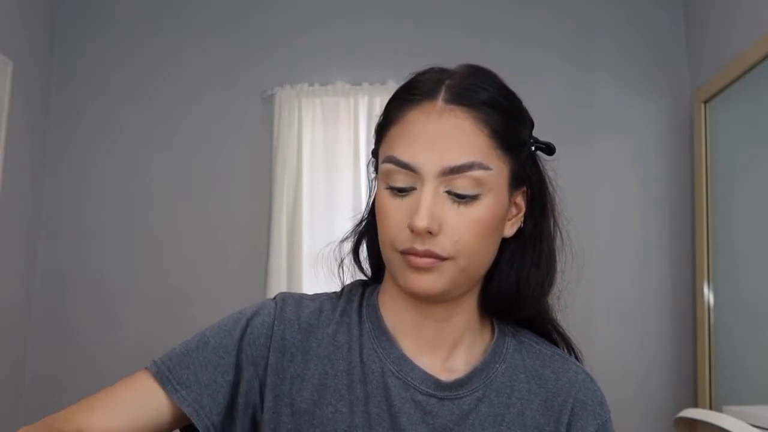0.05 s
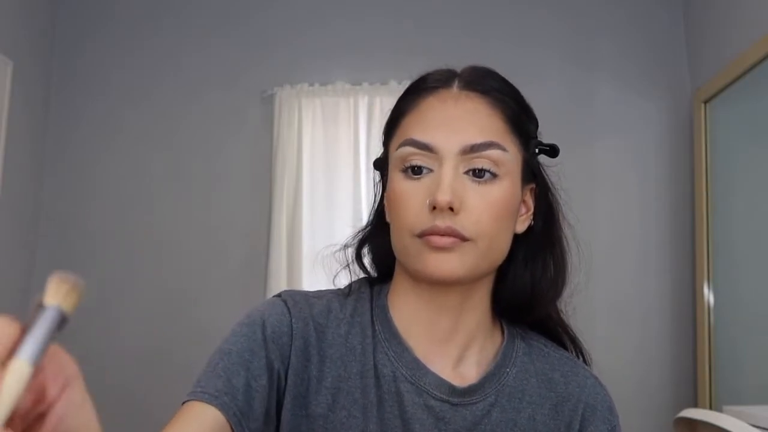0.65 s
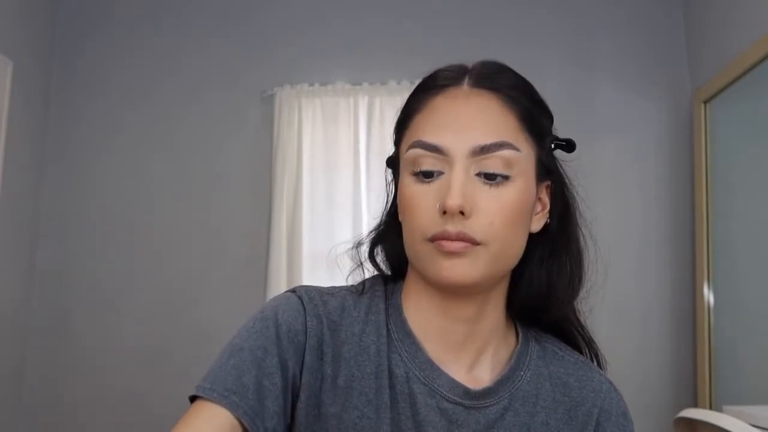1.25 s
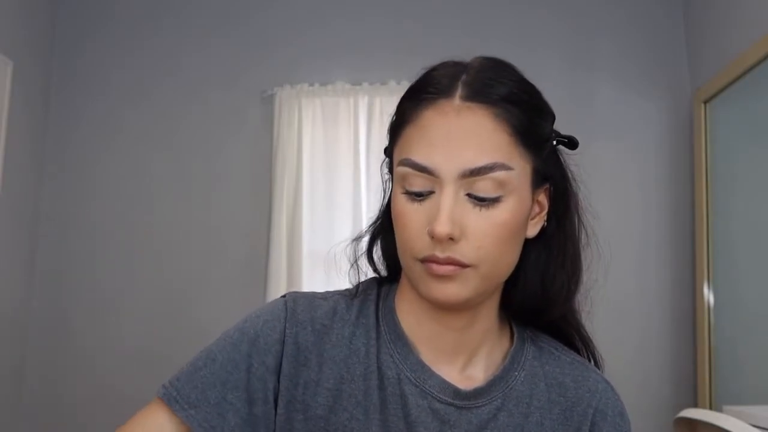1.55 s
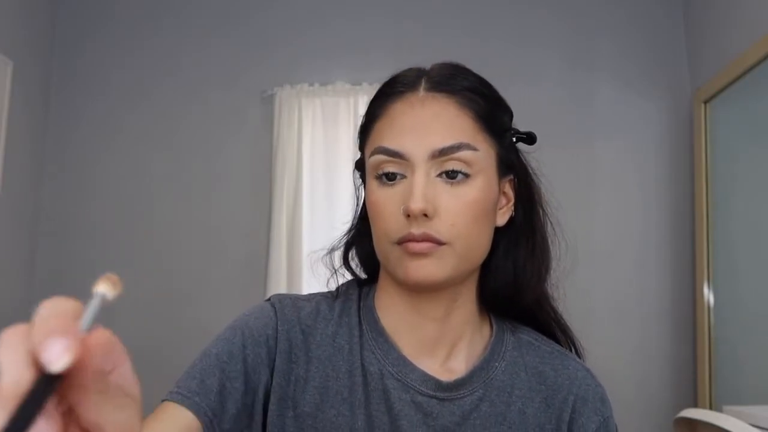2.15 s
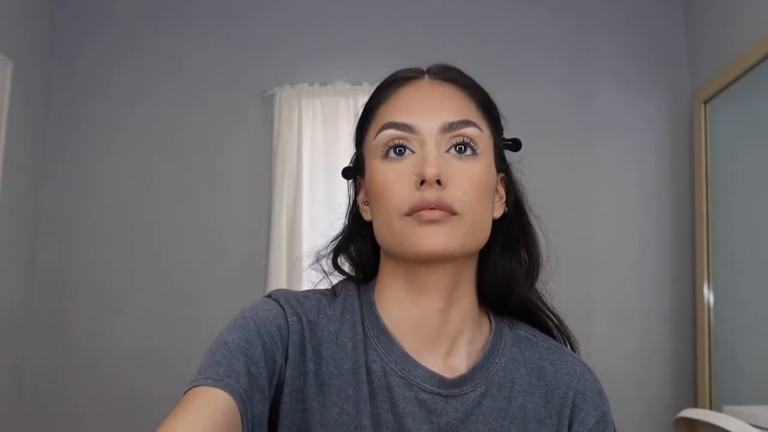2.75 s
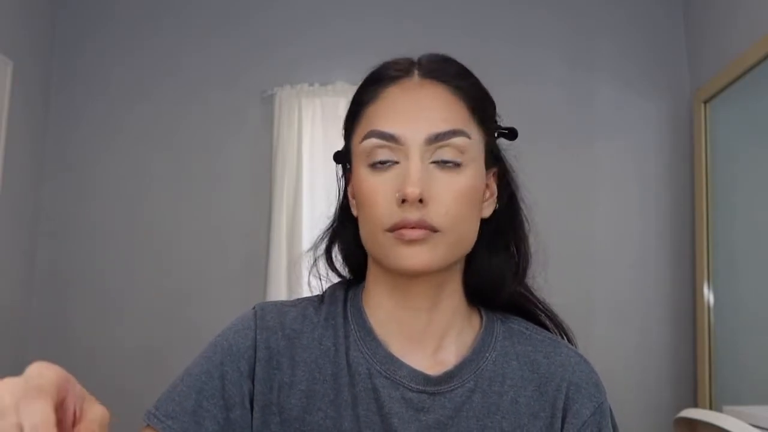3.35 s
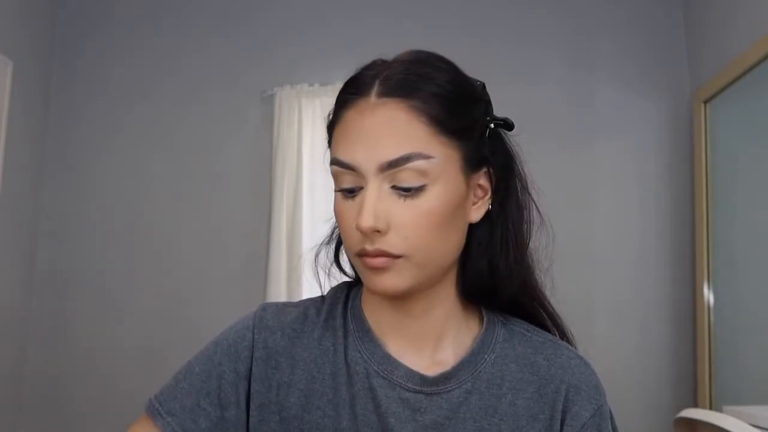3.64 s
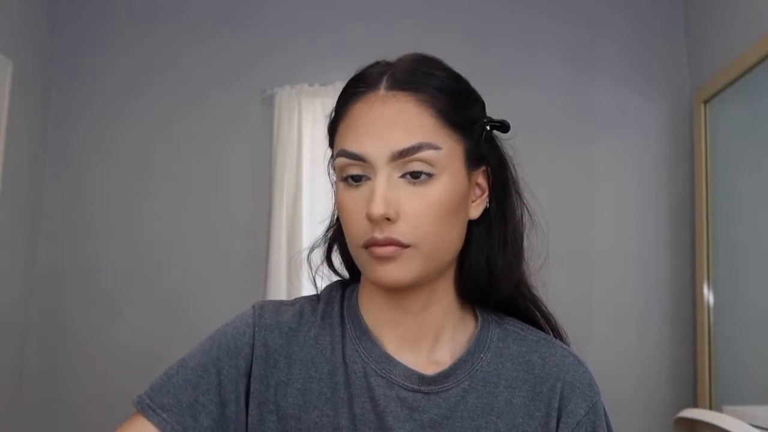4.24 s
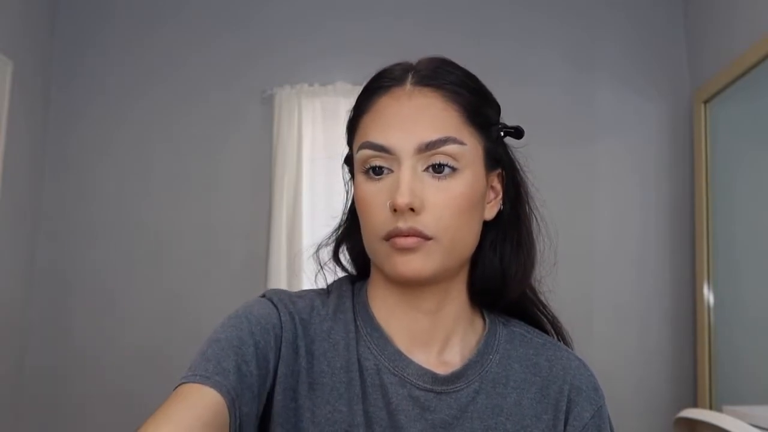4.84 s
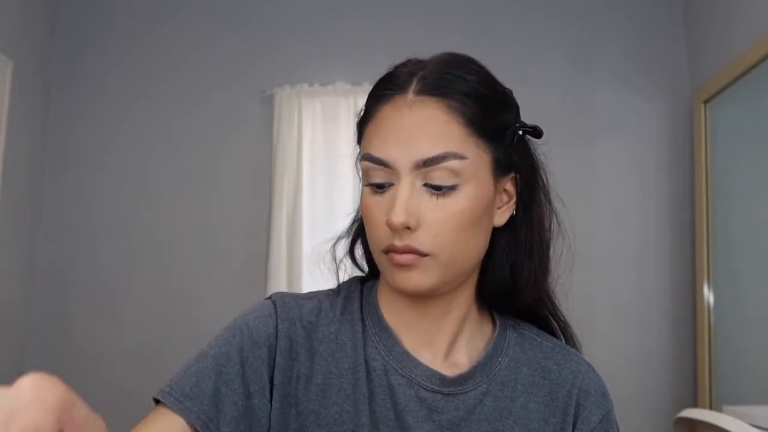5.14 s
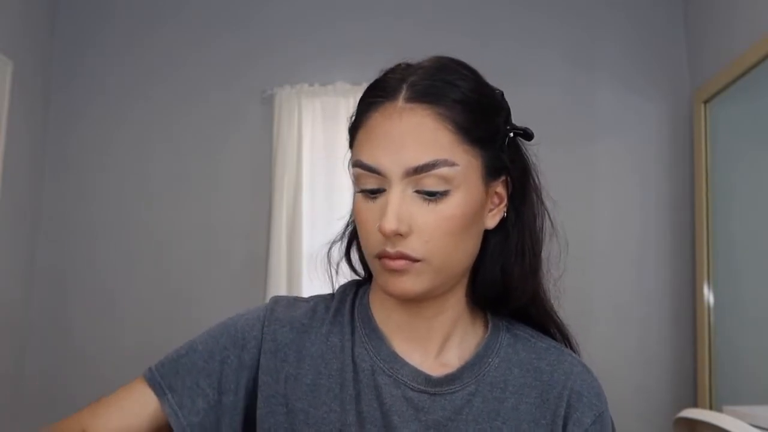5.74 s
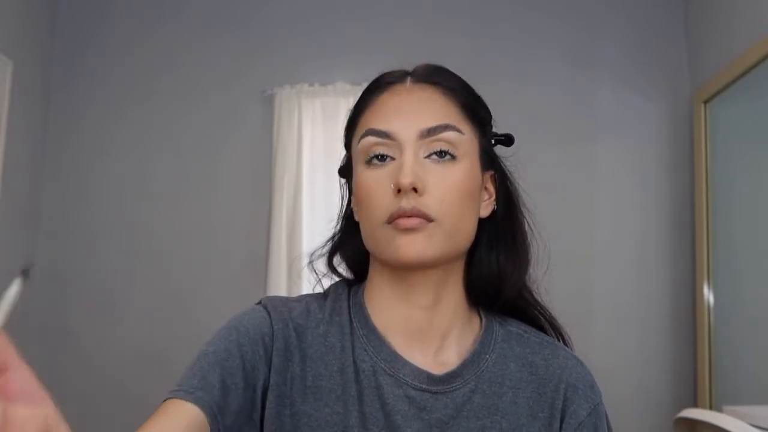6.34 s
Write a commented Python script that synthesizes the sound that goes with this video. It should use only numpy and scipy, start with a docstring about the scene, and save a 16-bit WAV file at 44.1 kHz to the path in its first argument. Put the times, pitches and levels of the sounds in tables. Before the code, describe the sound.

Brush handles rattle and small plastic containers are set down on a table with sharp clacks and dull knocks, a fan humming indoors.

```python
"""A table in a bare, lively room: makeup brushes and small hard cases are picked up, jostled, set down.
Each contact clicks and rings the item; handles rattle, metal ferrules tink, sliding items scrape.
Heavier ones thud in the tabletop, which then rocks with soft knocks. A fan hums throughout.
A close stereo microphone with a limiter picks it up."""
import sys
import numpy as np
from scipy import signal
from scipy.fft import rfft, irfft, next_fast_len
from scipy.io import wavfile

SR = 44100
rng = np.random.default_rng(int(sys.argv[2]) if len(sys.argv) > 2 else 0)


def to_wav(s):
    """Save 16-bit WAV."""
    ch = np.atleast_2d(s).T  # columns
    pcm = np.round(np.clip(ch, -1, 1) * 32767)  # PCM
    wavfile.write(sys.argv[1], SR, pcm.astype(np.int16))


N = 281706
CLICK_SEND_DB, THUD_SEND_DB = 0.5, -4.5  # room sends


# hard hits: t/s, level/dB, f/Hz, treble/dB, send trim/dB, item that rings on
HARD_HITS = [(.611, -25.5, 2680, 12, 1, "case"), (0.6623, -5, 1185, -1, -0.5, "handle"),
             (0.682, -20.5, 4840, 8, 0, "case"), (0.729, -11.5, 2430, 7, -8, "lid"),
             (.753, -13, 1210, -4, 6, "handle"), (.769, -8.5, 1320, -3.5, 5, "handle"),
             (0.78, -13.5, 1900, -6, -17, "handle"), (.794, -11.5, 1470, -2, -4, "handle"),
             (0.825, -14.5, 2920, 13, -1, "handle"), (.847, -9.5, 1210, -17, -3, "handle"),
             (.863, -7.5, 1240, 6, 2.5, "tube"), (0.876, -12, 3260, 1, 1, "case"),
             (.886, -22, 2600, -2, -3, "case"), (.902, -9, 1160, -2.5, 2, "handle"),
             (.946, -15, 1310, 6, 2, "handle"), (.964, -16.5, 2120, -11, 3, "handle"),
             (1.001, -23, 1280, -2, -1, "handle"), (1.033, -19.5, 1120, -4, -14, "handle"),
             (1.126, -17, 1850, -24, -5, "case"), (1.168, -24, 1116, -8, 1, "handle"),
             (1.229, -26.5, 3530, -9, -9, "case"), (1.235, -21.5, 1260, -7, -3.5, "case"),
             (1.712, -26, 1640, -32, 7, "handle"), (1.727, -34, 1900, -9, -5, "handle"),
             (1.768, -30.5, 2500, 23, 4, "handle"), (1.813, -17.5, 1770, -10, -0.5, "ferrule"),
             (1.895, -30.5, 2000, -2, -5, "handle"), (2.259, -9, 3140, 2, 3, "handle"),
             (2.274, -0.5, 1640, -4, 0.5, "case"), (2.292, -5.5, 4180, 16, -1, "case"),
             (2.321, -3, 1420, -11, -5, "palette"), (2.327, -2, 1810, -6, -4, "case"),
             (2.61, -10, 1290, -17.5, -3.5, "case"), (2.748, 3, 1400, -3.5, -2.5, "palette"),
             (2.792, -4.5, 1580, -6, 2.5, "palette"), (2.852, 0.5, 2040, -15, -4.5, "palette"),
             (4.057, -31.5, 2000, 1, -2, "handle"), (4.079, -28.5, 1690, 1, 4, "case"),
             (4.134, -18.5, 1532, -22, -6, "case"), (4.632, -11, 1400, 2, 5, "tube"),
             (4.643, -12.5, 1210, 8, 0, "handle"), (4.652, -4.5, 1230, 1, -8, "case"),
             (4.682, -6.5, 1850, 14, -5, "handle"), (4.70, -7, 1830, 11, -6, "palette"),
             (4.751, -18, 1860, -14, -21, "palette"), (4.798, -18.5, 1820, -7, -3.5, "palette"),
             (4.916, -12, 1050, 0, 5, "case"), (4.937, -7, 1820, 8.5, -6, "case"),
             (4.999, 3, 2300, -4, -1, "lid"), (5.021, -12.5, 4200, -3, 3, "lid"),
             (5.063, -13, 2300, -5, 4, "jar"), (5.489, -27, 2160, -9.5, 8.5, "handle"),
             (5.532, -21.5, 2390, -21, 0.5, "case"), (5.549, -24.5, 1900, -24, -6, "handle"),
             (5.823, -8.5, 2160, 3, 0.5, "jar"), (5.844, -30, 2480, 25, -12, "jar")]
def clicks(give_s=.0006, table_hz=310, push_db=-33.5, light_hz=1900, bass_db_per_octave=-12):
    """Items strike something hard: each blow pushes the tabletop, then clicks once the surface has given."""
    out = np.zeros((2, N))
    for s, db, hz, treble_db, trim_db, _ in HARD_HITS:
        bass_db = bass_db_per_octave * np.log2(hz / light_hz)  # small items sound higher and thinner
        add(out, s + give_s, routed(gain_of(db) * click(hz, treble_db, bass_db), CLICK_SEND_DB + trim_db))
        add(out, s, routed(gain_of(db + push_db) * thud(table_hz), THUD_SEND_DB))
    return out


# tone of a hard contact: f/Hz, level/dB
CLICK_EQ = [(60, -30), (250, 1), (500, -7), (800, -4.5), (1150, -0.5), (1550, -4.5), (2000, 1.5), (3200, 0),
            (4400, -5), (7500, -17.5), (11500, -13), (13500, -31), (16000, -29)]
def click(hz, treble_db=0, bass_db=0, size=1024):
    """Plastic or a wooden handle meets something hard; the stiff body swings up over a few cycles."""
    pulse = contact(CLICK_EQ, hz, treble_db, bass_db, ring_db=12, ring_octaves=0.31, size=size)
    ratio = bins(size) / hz
    allpass = (1 - ratio ** 2 - 1j * ratio) / (1 - ratio ** 2 + 1j * ratio)
    pulse = irfft(rfft(pulse) * allpass)
    return chatter(pulse / abs(pulse).max(), db=-4.5, t60=.012)


# ring of each item, one mode a row: f/Hz, level/dB, t60/s
FERRULE_MODES = [(7120, -22, 0.088), (8300, -23, 0.042), (10500, 2, 0.041), (12030, 7, 0.048),
                 (12300, -9, 0.13), (12450, -6, 0.081), (14250, -12, 0.18)]  # a brush's metal collar
JAR_MODES = [(2188, 3.5, 0.035), (2300, -19, 0.018), (2680, 4.5, 0.023), (3800, -10, 0.02),
             (4930, -9, .025), (7130, -15, 0.04)]  # small jar
HANDLE_MODES = [(1167, 5.5, 0.028), (1400, -7, 0.022), (2095, 3.5, 0.05), (2772, 4.5, 0.018)]  # brush handle
CASE_MODES = [(2100, -13, 0.0064), (2370, 0, 0.012), (2570, -7, 0.0086), (3030, 0, 0.019),
              (2840, -1.5, 0.0034), (3337, 2.5, 0.029), (3970, -24, 0.011)]  # plastic case
PALETTE_MODES = [(1196, 0.5, 0.06), (1350, -1.5, 0.019), (1600, -14, 0.033), (1864, 7.5, 0.063),
                 (2200, 0, 0.032), (2940, 11, 0.011), (4440, -8, 0.02)]  # flat palette
LID_MODES = [(2000, -15.5, 0.029), (2180, -29, 0.021), (3190, -10.5, 0.015), (3530, -4, 0.0091),
             (4300, -19, 0.012)]  # lid snapping shut
TUBE_MODES = [(1416, 2.5, 0.065), (2204, -0.5, 0.023), (2870, 0, 0.03)]  # hollow tube
def ringing(item, modes, ring_db, send_db, detune_octaves=0, spread_db=3, give_s=.0006):
    """A small item rings on after its hits; where it is struck decides which modes ring most."""
    out, t = np.zeros((2, N)), np.arange(8000) / SR
    for s, db, _, _, trim_db, struck in HARD_HITS:
        if struck == item:
            detune = 2 ** rng.uniform(-detune_octaves, detune_octaves)
            ring = np.zeros(len(t))
            for hz, mode_db, t60 in modes:
                decay = gain_of(mode_db + rng.uniform(-spread_db, spread_db) - 60 * t / t60)
                ring += decay * np.sin(2 * np.pi * detune * hz * t)
            add(out, s + give_s, routed(gain_of(db + ring_db) * ring, send_db + trim_db))
    return out


# soft, heavy landings: t/s, level/dB, f/Hz, send trim/dB
LANDINGS = [(.663, -11.5, 302, -5), (0.755, -13, 242, -10), (.797, -4, 306, 2.5), (.856, -10, 232, 2),
            (.95, -19.5, 232, 4.5), (1.186, -16, 320, -2), (1.673, -13, 250, 1), (1.68, -8.5, 170, -0.5),
            (1.724, -13, 302, -9), (2.308, -9, 340.4, -2), (2.495, -7.5, 323, 1), (2.906, -5.5, 300, -1.5),
            (4.057, -22, 230, 0), (4.082, -23, 220, 3), (4.643, -14.5, 340, -2), (4.65, -13.5, 385, 0),
            (4.657, -12.5, 99, 3.5), (4.683, -14, 220, 1), (4.93, -15, 261, 1.5), (5.49, -14.5, 308, 2),
            (5.507, -9.5, 210, -3), (5.533, -16, 293, 3), (5.577, -19, 290, -5), (5.823, -23.5, 378, -4)]
def thuds(give_s=0.00088, tick_db=-15.5):
    """A hand or a heavy item lands: a faint tick as it touches, then the tabletop gives."""
    out = np.zeros((2, N))
    for s, db, hz, trim_db in LANDINGS:
        tick = gain_of(db + tick_db) * click(hz=1900, treble_db=-0.5)
        body = gain_of(db) * thud(hz, treble_db=0.8, bass_db=3)
        add(out, s, routed(tick, CLICK_SEND_DB))
        add(out, s + give_s, routed(body, THUD_SEND_DB + trim_db))
    return out


# tone of the struck tabletop: f/Hz, level/dB
TABLETOP_EQ = [(30, -37), (70, -4), (100, 6.5), (160, 4.5), (230, 0.5), (300, 2), (480, -3), (700, -14),
               (1500, -19), (5000, -79)]
def thud(hz, treble_db=0, bass_db=0):
    """The tabletop gives under one blow: dull and short."""
    pulse = contact(TABLETOP_EQ, hz, treble_db, bass_db, ring_db=8, ring_octaves=0.42, size=4096)
    return chatter(pulse, db=-12, t60=0.06)


# runs of jostling handles: t/s, length/s, centre level/dB, centre f/Hz
JOSTLES = [(0.68, 0.02, -13, 1450), (0.757, 0.18, -24, 1300), (1.136, 0.024, -26, 1102),
           (2.283, 0.096, -14, 1400), (4.641, 0.08, -12.5, 1000), (4.921, 0.036, -16.5, 851),
           (5.533, 0.055, -31, 860)]
def rattles(per_s=100, spread_db=8, spread_octaves=0.9, glint_db=6, bright_db=-10.5, send_db=1.5):
    """Handles knock together in quick uneven runs that settle; every third knock shakes the table."""
    out = np.zeros((2, N))
    for s, length, start_db, centre_hz in JOSTLES:
        for k in range(int(length * per_s) + 1):
            after = (k + rng.random()) / per_s
            db = start_db + np.interp(after / length, [0.85, 1], [0, -12.5])  # holds, then falls away
            force = gain_of(db + rng.uniform(-spread_db, spread_db))
            detune = 2 ** rng.uniform(-spread_octaves, spread_octaves)
            treble_db = 0.69 * (db - bright_db) + rng.uniform(-glint_db, glint_db)  # softer is duller
            add(out, s + after, routed(force * click(centre_hz * detune, treble_db), send_db))
            if k % 3 == 0:
                add(out, s + after, routed(force * gain_of(-5) * thud(hz=220 * detune), send_db))
    return out


# ferrule touches: t/s, level/dB
FERRULE_TOUCHES = [(.661, -18.5), (.735, -24), (0.837, -15.5), (0.901, -32), (.929, -32), (1.809, -22),
                   (2.289, -22), (4.644, -31), (4.653, -19), (4.664, -28), (4.674, -27), (4.686, -17),
                   (4.697, -31)]
# tone of thin metal: f/Hz, level/dB
METAL_EQ = [(500, -18), (3000, 0), (5500, -4), (8000, -2), (11500, 0.5), (13500, -8), (16000, -22)]
def tinks(centre_hz=10500, spread_octaves=0.8, send_db=-5):
    """Metal ferrules touch in the bundle of brushes: tiny bright ticks, each at its own pitch."""
    out = np.zeros((2, N))
    for s, db in FERRULE_TOUCHES:
        hz = centre_hz * 2 ** rng.uniform(-spread_octaves, spread_octaves)
        tick = contact(METAL_EQ, hz, ring_db=3.5, ring_octaves=0.15)
        add(out, s, routed(gain_of(db) * chatter(tick, db=12, t60=0.011), send_db))
    return out


# gritty fading tail of a clatter at the start, then slides over the tabletop:
# t/s, length/s, grain level/dB, f/Hz, tabletop blend/dB
GRIT_BURSTS = [(0.0, 0.055, -25.5, 1900, -11.5), (1.723, 0.113, -38, 1900, 4),
               (1.867, 0.041, -40, 1980, -7), (4.074, 0.024, -37.5, 1600, -17),
               (4.137, 0.01, -30, 1510, -29), (5.613, 0.046, -38.5, 2200, -11),
               (5.702, 0.11, -36.5, 2250, -16)]
# tone of one grain: f/Hz, level/dB
GRIT_EQ = [(100, -41), (500, -22), (800, 11), (1200, 2), (2000, 1.5), (3100, 0), (4200, -8), (7000, -19.5),
           (14000, -25)]
def grit(per_s=600, spread_db=5.5, fade_s=0.0021):
    """Dense grains with some tabletop in them: first a clatter's tail, later the stick-slip of slides."""
    out = np.zeros((2, N))
    impulses = (rng.random(N) < per_s / SR) * rng.choice([-1, 1], N)
    impulses = impulses * gain_of(rng.uniform(-spread_db, spread_db, N))
    board = contact(TABLETOP_EQ, hz=560, bass_db=-3, ring_db=7.5, ring_octaves=0.33)
    for s, length, db, hz, table_db in GRIT_BURSTS:
        t = np.arange(0, length, 1 / SR)
        fades = np.minimum(np.minimum(t, length - t) / fade_s, 1)
        burst = impulses[round(s * SR):][:len(t)] * fades
        grain = contact(GRIT_EQ, hz, ring_db=6, ring_octaves=0.43) + gain_of(table_db) * board
        add(out, s, routed(gain_of(db) * signal.fftconvolve(burst, grain), send_db=0))
    return out


# nudges that set the table rocking: t/s, level/dB
NUDGES = [(1.263, -23), (3.207, -25)]
# knocks within one swing: t/s from its start, relative level/dB
KNOCKS = [(0, 0), (.044, 0.5), (.083, -12)]
def rocking(swings=4, first_swing_s=.218, slowing_s=.016, fade_db=-2.5):
    """The table rocks to rest: each swing is a group of soft knocks, longer and weaker than the last."""
    out = np.zeros((2, N))
    for s, db in NUDGES:
        for k in range(swings):
            for after, knock_db in KNOCKS:
                knock = thud(hz=264, treble_db=-12.5, bass_db=-18)
                add(out, s + after, routed(gain_of(db + knock_db + k * fade_db) * knock, send_db=-9))
            s += first_swing_s + k * slowing_s
    return out


# early reflections: delay/s, level/dB
EARLY_ECHOES = [(.0013, -28), (.0031, -13), (.0098, -42), (0.0199, -14)]
# stereo phase: f/Hz, left lead/rad
LEFT_LEAD = [(800, 0), (1300, .3), (2000, .45), (2800, 1), (4000, 1.75), (5500, 2), (8000, 2.8),
             (11500, 2.5)]
# stereo balance: f/Hz, left over right/dB
LEFT_TILT = [(180, 0), (600, 1), (1300, 2.5), (3500, 3.5), (8000, 3.5), (12000, 1)]
def close_mic(direct, size=256):
    """Direct sound and first echoes, heard close: above about 1 kHz the left channel runs ahead in phase, more
    so higher up, and is a little louder."""
    heard = direct.copy()
    for delay, db in EARLY_ECHOES:
        add(heard, delay, gain_of(db) * direct)
    f = bins(size)
    left = gain_of(curve(LEFT_TILT, f) / 2) * np.exp(.5j * curve(LEFT_LEAD, f))
    taps = np.roll(irfft(np.array([left, 1 / left])), size // 2, axis=1)
    return signal.oaconvolve(heard[None], taps, axes=1)[:, size // 2:][:, :N]


def room(sent, cycles_per_s=4, count=3):
    """As the hand moves, the sound meets different reflections: a circling crossfade into several tails."""
    turn = cycles_per_s * np.arange(N) / SR
    shares = np.array([np.maximum(np.cos(2 * np.pi * (turn + k / count)), 0) for k in range(count)])
    shares /= np.linalg.norm(shares, axis=0)
    return sum(signal.oaconvolve((share * sent)[None], room_tail(), axes=1)[:, :N] for share in shares)


# reverb decay: f/Hz, t60/s
TAIL_T60 = [(100, 1.5), (300, 0.5), (700, 0.51), (2000, 0.52), (4000, 0.53), (8000, .5), (14000, 0.2)]
# reverb tone: f/Hz, level/dB
TAIL_EQ = [(60, -1.5), (150, -4), (300, 3), (700, 1.5), (1200, -2.5), (2000, 1.5), (4000, -1.5), (8000, 2),
           (14000, -9.5)]
# reverb width: f/Hz, left-right correlation
TAIL_CORRELATION = [(200, 1), (1000, 0.99), (2200, 1), (3500, 0.86), (5000, 0.48), (6500, 0.11),
                    (10000, -0.46), (12500, -0.88)]
def room_tail(predelay_s=0.00082, build_s=0.0061):
    """Diffuse reflections build up, then die band by band."""
    f, t, noise = signal.stft(rng.standard_normal((2, SR)), SR, nperseg=512)
    f = f[:, None]
    t60 = curve(TAIL_T60, f)
    unit_energy = np.sqrt(2 * np.log(1000) / (t60 * SR))
    bands = noise * gain_of(curve(TAIL_EQ, f) - 60 * t / t60) * unit_energy
    tail = signal.istft(stereo(*bands, curve(TAIL_CORRELATION, f)), SR, nperseg=512)[1]
    return tail * np.clip((np.arange(tail.shape[1]) / SR - predelay_s) / build_s, 0, 1)


# motor hum: f/Hz, rms level/dB
MOTOR_TONES = [(57.7, -38.5), (120, -47.5), (230.8, -51.5)]
# tone of the rushing air: f/Hz, level/dB
AIR_EQ = [(25, 0), (80, -4.5), (160, 2), (310, -1.5), (500, -7), (1000, -11.5), (2500, -17.5), (4000, -21),
          (8000, -30), (13000, -39), (16000, -48)]
# whirring peaks in the rush: f/Hz, half-width/Hz, boost/dB
AIR_PEAKS = [(105, 7.1, 15.5), (236.6, 4.3, 8.5), (394, 8.1, 15), (1865, 29, 14), (2813, 31, 11.5)]
# width of the rush: f/Hz, left-right correlation
AIR_CORRELATION = [(100, 1), (400, 0.66), (1000, 0.42), (2000, 0.87), (4000, 0.49), (10000, 0.55)]
def fan(air_mids_db=-55.5):
    """Steady motor tones over a soft rush of air with a few narrow resonances."""
    t, size = np.arange(N) / SR, next_fast_len(N, True)
    hum = sum(np.sqrt(2) * gain_of(db) * np.sin(2 * np.pi * (hz * t + rng.random()))
              for hz, db in MOTOR_TONES)
    f = bins(size)
    whir_db = sum(db / (1 + ((f - hz) / width) ** 2) for hz, width, db in AIR_PEAKS)
    spectra = rfft(rng.standard_normal((2, size))) * gain_of(curve(AIR_EQ, f) + whir_db)
    mids_rms = irfft(spectra[0] * ((f > 500) & (f < 1500)), size).std()
    rush = irfft(stereo(*spectra, curve(AIR_CORRELATION, f)), size)[:, :N]
    return hum + gain_of(air_mids_db) / mids_rms * rush


def contact(eq, hz, treble_db=0, bass_db=0, *, ring_db, ring_octaves, size=1024):
    """One blow of peak 1: the material's tone with a damped resonance that depends on where it lands."""
    f = bins(size)
    octaves = np.log2((f + 1) / hz)
    resonance = ring_db / (1 + (octaves / ring_octaves) ** 2)
    shelves = treble_db * np.clip(octaves / 2, 0, 1) + bass_db * np.clip(-octaves / 2, 0, 1)
    pulse = minimum_phase(curve(eq, f) + resonance + shelves)
    return pulse / abs(pulse).max()


def chatter(pulse, db, t60):
    """Dense small modes carry the blow on for a moment."""
    t = np.arange(len(pulse)) / SR
    burst = rng.standard_normal(len(t)) * gain_of(-60 * t / t60) * np.minimum(t / t60 * 10, 1)
    return pulse + gain_of(db) * signal.fftconvolve(pulse, burst / np.linalg.norm(burst))[:len(t)]


def minimum_phase(db):
    """The most compact pulse with this spectrum: sharp attack, then decay."""
    cepstrum = irfft(np.log(gain_of(db)))
    half = len(cepstrum) // 2
    cepstrum[1:half] *= 2
    cepstrum[half + 1:] = 0
    return irfft(np.exp(rfft(cepstrum)))


def stereo(mid, side, correlation):
    """Left and right with a given correlation, from two unrelated spectra."""
    correlation = np.clip(correlation, -.999, .999)
    mid, side = mid * np.sqrt((1 + correlation) / 2), side * np.sqrt((1 - correlation) / 2)
    return np.array([mid + side, mid - side])


def routed(sound, send_db):
    """Two buses: direct sound and room send."""
    return np.array([sound, gain_of(send_db) * sound])


def add(mix, s, sound):
    """Mixes a sound in at time s."""
    part = mix[..., round(s * SR):][..., :sound.shape[-1]]
    part += sound[..., :part.shape[-1]]


def curve(points, hz):
    """Joins (f/Hz, value) points on a log-frequency axis."""
    f, value = np.transpose(points)
    return np.interp(np.log(hz + 1), np.log(f + 1), value)


def bins(size):
    """Frequencies of a real spectrum."""
    return np.fft.rfftfreq(size, 1 / SR)


def gain_of(db):
    """Decibels to amplitude."""
    return 10 ** (np.asarray(db) / 20)


def scene():
    """Everything on the table, heard close and through the room, over the fan."""
    background = fan()
    table = clicks() + thuds() + rocking()
    table += ringing("ferrule", FERRULE_MODES, ring_db=-10.5, send_db=-0.5)
    table += ringing("jar", JAR_MODES, ring_db=-9, send_db=-5.5)
    # every brush has its own pitch
    table += ringing("handle", HANDLE_MODES, ring_db=-15.5, send_db=-4.5, detune_octaves=.25)
    table += ringing("case", CASE_MODES, ring_db=-18, send_db=-2.5)
    table += ringing("palette", PALETTE_MODES, ring_db=-17.5, send_db=-1.5)
    table += ringing("lid", LID_MODES, ring_db=-4.5, send_db=1)
    table += ringing("tube", TUBE_MODES, ring_db=-7.5, send_db=-4)
    direct, sent = table + rattles() + grit() + tinks()
    return close_mic(direct) + room(sent) + background


def record(dry, threshold_db=1, attack_s=0.0023, release_s=0.41, cutoff_hz=15900):
    """The sharpest clicks clip briefly before a limiter ducks the gain; a low-pass trims the top."""
    over_db = np.maximum(20 * np.log10(abs(dry).max(0) + 1e-9) - threshold_db, 0)
    release = np.exp(-np.arange(N) / SR / release_s)
    held_db = np.maximum.accumulate(over_db / release) * release  # recovers quickly at first
    lag = np.exp(-1 / (attack_s * SR))
    duck_db = signal.lfilter([1 - lag], [1, -lag], held_db)
    limited = np.clip(dry / gain_of(duck_db), -1, 1)
    lowpass = signal.firwin(255, cutoff_hz, window=("kaiser", 9), fs=SR)
    return signal.oaconvolve(limited, lowpass[None], "same")


dry = scene()
out = record(dry)
to_wav(out)
```